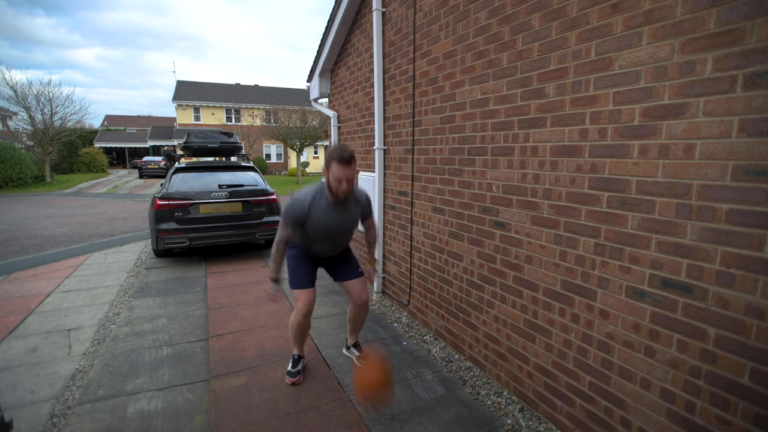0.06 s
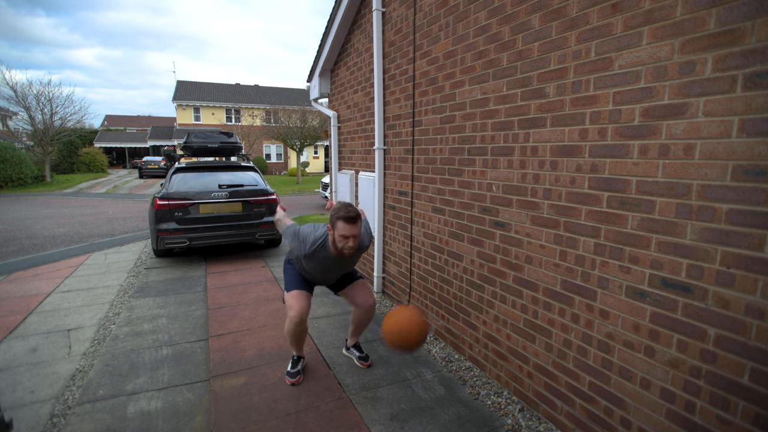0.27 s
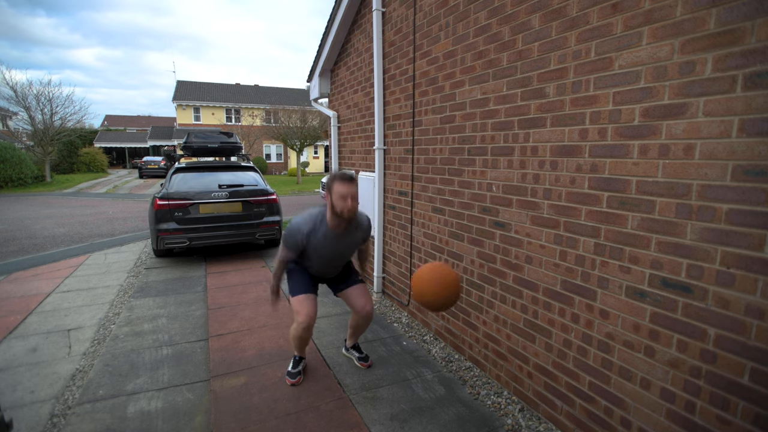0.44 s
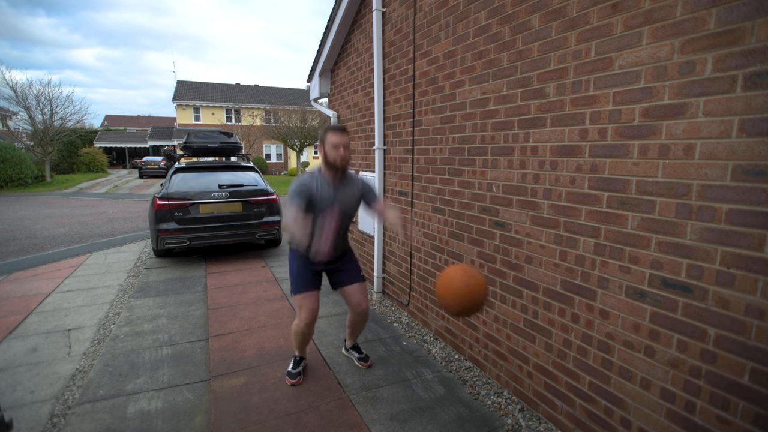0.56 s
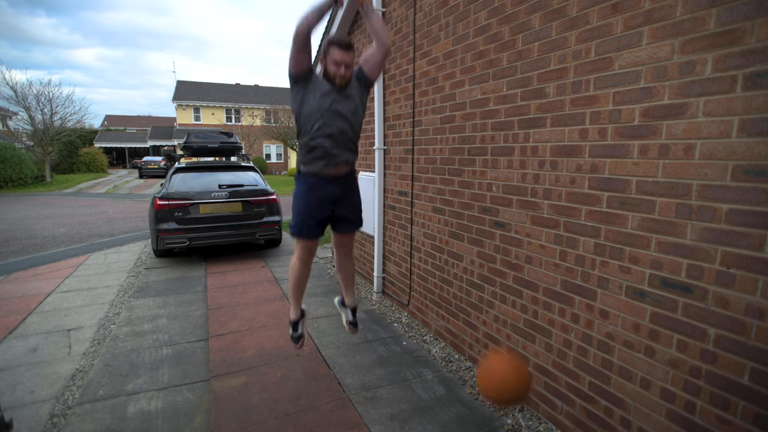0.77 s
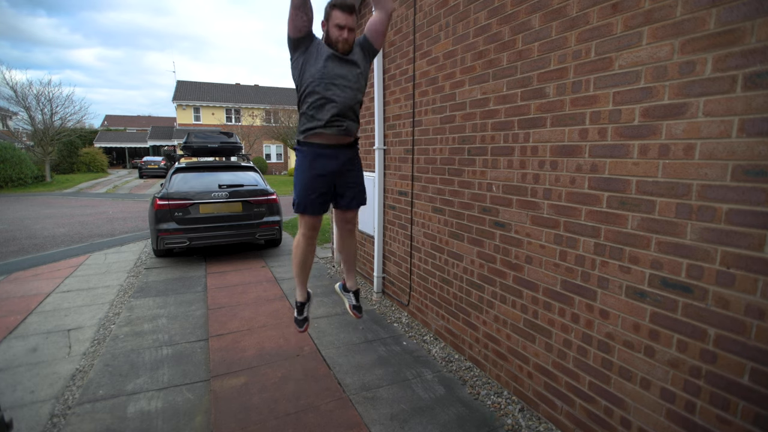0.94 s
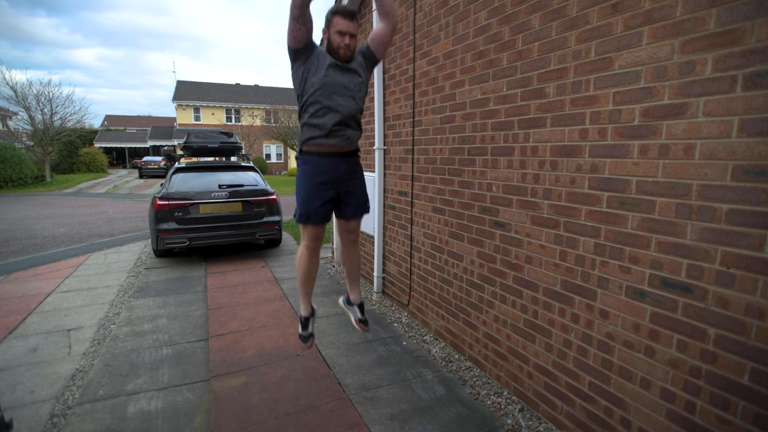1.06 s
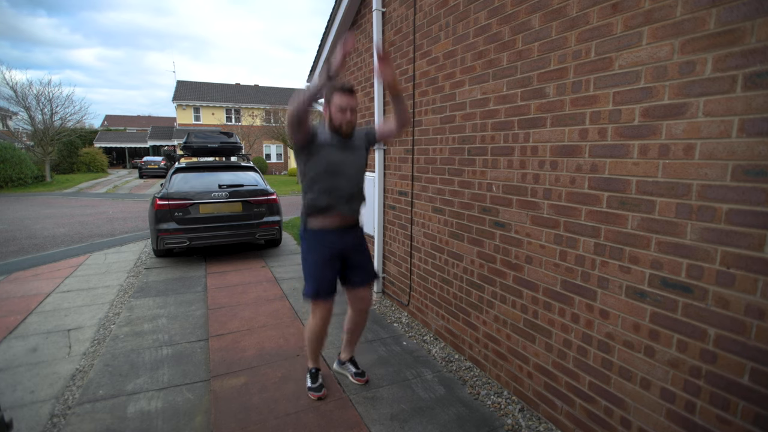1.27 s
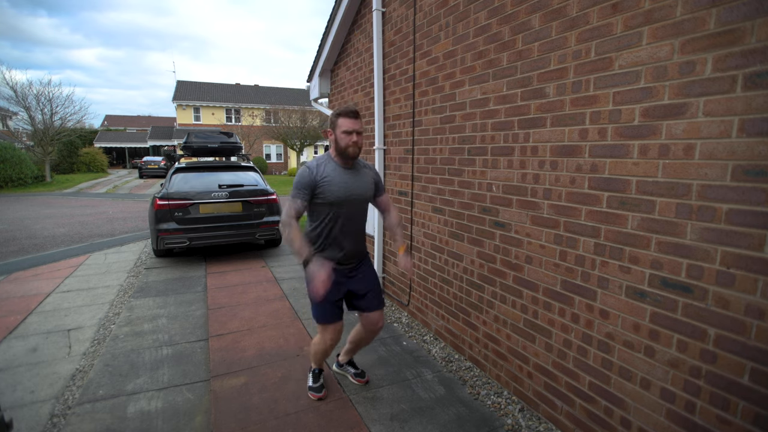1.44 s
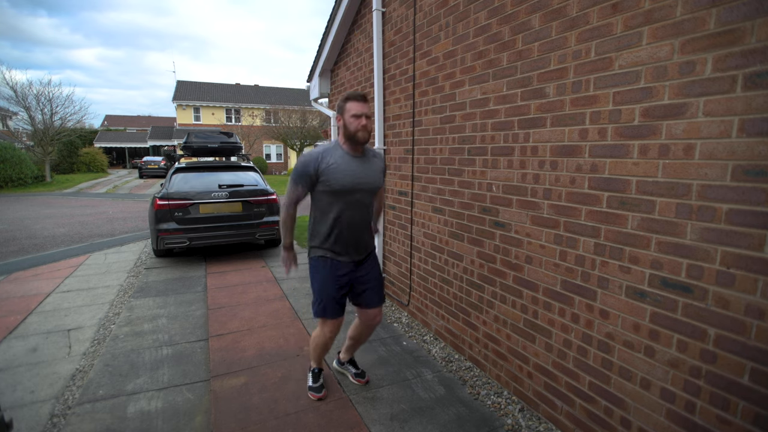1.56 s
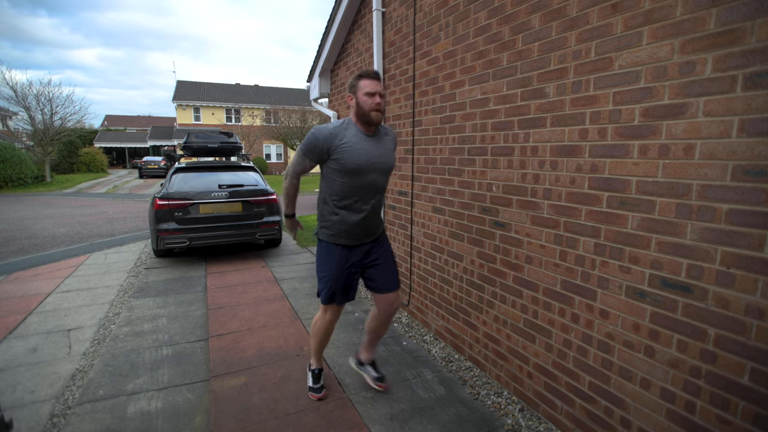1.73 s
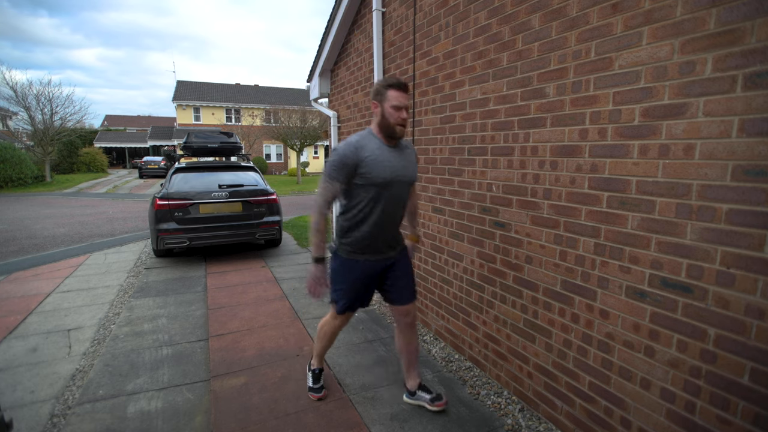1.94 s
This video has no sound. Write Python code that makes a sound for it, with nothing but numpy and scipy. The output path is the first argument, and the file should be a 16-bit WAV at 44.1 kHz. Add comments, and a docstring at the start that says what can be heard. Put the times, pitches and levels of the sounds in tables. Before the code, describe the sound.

Heavy ball slam on paving with sharp street echo, then a bounce, jumping feet and loose stones

```python
"""A paved drive beside a brick wall, houses beyond, over a quiet street hum that lasts throughout. Hands and cloth
swish at the throw, a knock sounds, then a heavy ball slams down and the house fronts throw the slam back. Shoes
scuff the grit as a jumper pushes off, the ball bounces, soles land; then hollow knocks and loose stones by the wall.
Blows are sharp pulses with near copies and noise tails; scuffs and stones are shaped noise grains; knocks are
damped tones; thuds are low tones that sink in pitch; the hum is coloured noise."""
import sys
import numpy as np
from scipy import signal
from scipy.fft import rfft, irfft
from scipy.io import wavfile
from scipy.ndimage import uniform_filter1d

SR = 44100
rng = np.random.default_rng(int(sys.argv[2]) if len(sys.argv) > 2 else 0)


def unload_wav(signal):
    """Save mono or channel-first audio to the path in sys.argv[1] as 16-bit WAV at rate SR, clipped to [-1, 1]."""
    wavfile.write(
        sys.argv[1],
        SR,
        np.round(np.clip(np.atleast_2d(signal).T, -1, 1) * 32767).astype(np.int16),
    )


N = 88200  # samples: 2 s


def amp(db):
    """Decibels to amplitude."""
    return 10 ** (np.asarray(db) / 20)


def unit(x):
    """Scale to an RMS of 1."""
    return x / np.sqrt(np.mean(x ** 2) + 1e-20)


def along(points, hz):
    """Read a curve of (Hz, value) points along a log frequency axis."""
    point_hz, values = np.transpose(points)
    return np.interp(np.log(hz + 1), np.log(point_hz + 1), values)


def smooth_patches(shape, bins, frames):
    """Random time-frequency patches, averaged over neighbouring bins and frames, RMS 1."""
    field = uniform_filter1d(rng.standard_normal(shape), size=bins, axis=0)
    return unit(uniform_filter1d(field, size=frames, axis=1))


def high_pass(x, cut_hz, order):
    """Butterworth bass cut."""
    return signal.sosfilt(signal.butter(order, cut_hz, "high", fs=SR, output="sos"), x)


def pulse(colour, tilt_db, size=4096):
    """The shortest causal (minimum-phase) pulse with this colour and tilt in dB per octave, energy 1."""
    hz = np.fft.rfftfreq(size, 1 / SR)
    colour_db = along(colour, hz) + tilt_db * np.log2((hz + 100) / 1000)
    cepstrum = irfft(np.log(amp(colour_db)))
    # folding the cepstrum onto positive time packs the energy at the start
    cepstrum[1:size // 2] *= 2
    cepstrum[size // 2 + 1:] = 0
    p = irfft(np.exp(rfft(cepstrum)))
    return p / np.linalg.norm(p)


def add(out, start_s, x):
    """Mix x into out from start_s, cut at the end of out."""
    place = out[round(start_s * SR):][:len(x)]
    place += x[:len(place)]


def swell(loudest_s, rise_s, t60_s):
    """Exponential rise (time constant rise_s) to 1 at loudest_s, then a fall of 60 dB in t60_s."""
    t = np.arange(N) / SR - loudest_s
    rise = np.exp(np.minimum(t, 0) / rise_s)
    fall = amp(-60 * np.maximum(t, 0) / t60_s)
    return np.where(t < 0, rise, fall)


# quiet street air, colour: freq_hz, density_db (dB per Hz, relative)
HUM_COLOUR = [(25, -72), (60, -15.5), (150, -3), (500, -9.5), (1100, -16), (1600, -20), (2800, -27.5),
              (3600, -17), (4300, -33.5), (5500, -32), (13000, -37)]
# its loudness over time: time_s, level_db
HUM_LEVEL = [(0, -48), (.22, -43), (.7, -45.5), (.92, -45), (1.05, -46.5), (1.36, -48.5), (1.662, -47.5),
             (2, -47)]


def hum():
    """Far traffic and air: coloured noise in slowly shifting time-frequency patches."""
    z = signal.stft(rng.standard_normal(N + 4096), nperseg=512)[2]
    air = signal.istft(z * amp(0.74 * smooth_patches(z.shape, 5, 12)), nperseg=512)[1]
    coloured = signal.fftconvolve(air, pulse(HUM_COLOUR, 0))[4096:N + 4096]
    level_db = np.interp(np.arange(N) / SR, *np.transpose(HUM_LEVEL))
    return amp(level_db) * unit(coloured)


# how long the street rings at speed 1: freq_hz, t60_s
STREET_DECAY = [(60, 0.64), (160, 0.42), (420, 0.33), (1100, 0.58), (2900, 0.68), (5000, 0.55),
                (8000, 0.31), (12000, 0.1)]
# where the speed factors apply, middle spanning two points: freq_hz
SPEED_HZ = (300, 1000, 3200, 5500)
LUMPS_DB = 1.5  # unevenness of the tail


def street(hold_s, bass, middle, treble):
    """A dense noise echo: full for hold_s, then each frequency dies at its own speed factor over its t60."""
    hz, t, z = signal.stft(rng.standard_normal(SR), SR, nperseg=256)
    lumps = smooth_patches(z.shape, 14, 3)
    speed = np.interp(hz, SPEED_HZ, [bass, middle, middle, treble]) / along(STREET_DECAY, hz)
    fall_db = 60 * speed[:, None] * np.maximum(t - hold_s, 0)
    tail = signal.istft(z * amp(LUMPS_DB * lumps - fall_db), SR, nperseg=256)[1]
    onset = 1 - np.exp(-np.arange(len(tail)) / SR / .004)
    return tail * onset / np.sqrt(SR * .01)


# the slam off house fronts, about 27 to 55 m away by delay: start_s, level_db, tilt_db_per_octave, bass_cut_hz
FRONTS = [(.404, 7, 2, 800), (.44, 5, -2, 200), (.487, -3, 1, 1500), (.555, -6, -1, 800),
          (.569, 0, -1, 950)]
FRONT_SPEED = 12  # decay speed factor, all bands


def fronts():
    """Each far wall returns the slam as a short noise burst in the ball's colour, thinned in the bass."""
    out = np.zeros(N)
    for start_s, level_db, tilt_db, cut_hz in FRONTS:
        tail = street(0, FRONT_SPEED, FRONT_SPEED, FRONT_SPEED)
        burst = signal.fftconvolve(tail, pulse(BALL_COLOUR, tilt_db))
        add(out, start_s, amp(level_db) * high_pass(burst, cut_hz, 4))
    return out


# short hollow knocks: loudest_s, pitch_hz, level_db, rise_s, t60_s
KNOCKS = [(.148, 375, -37, .006, .15), (.81, 3050, -26, .001, .05), (1.7065, 4900, -19, .0004, .07),
          (1.7095, 862, -19, .002, .07), (1.71, 440, -16, .002, .055), (1.711, 1080, -23, .002, .05),
          (1.991, 520, -30.5, .004, .5)]


def knocks():
    """Brief damped tones whose phase wanders a little."""
    t = np.arange(N) / SR
    out = np.zeros(N)
    for loudest_s, pitch_hz, level_db, rise_s, t60_s in KNOCKS:
        drift = 0.013 * np.cumsum(rng.standard_normal(N))
        tone = np.sin(2 * np.pi * pitch_hz * t + drift)
        out += amp(level_db) * swell(loudest_s, rise_s, t60_s) * tone
    return out


GRAINS_PER_S, GRAIN_SPREAD_DB = 4500, 1.6  # grain density; mean random boost of a grain
HISS_SHARE = 1  # hiss against grains, before the mix is levelled


def rubbing(rows, colour):
    """Friction as random fine grains plus smooth hiss, swelling and dying, with a little street tail."""
    out = np.zeros(N)
    for loudest_s, level_db, rise_s, t60_s, tilt_db, echo_db in rows:
        struck = rng.random(N) < GRAINS_PER_S / SR
        boost = amp(GRAIN_SPREAD_DB * rng.exponential(size=N))
        grains = unit(struck * rng.standard_normal(N) * boost)
        texture = unit(grains + HISS_SHARE * rng.standard_normal(N))
        rub = amp(level_db) * swell(loudest_s, rise_s, t60_s) * texture
        echo = signal.fftconvolve(rub, street(0, 0.91, 2.4, 1.5))[:N] / np.sqrt(SR * 0.0011)
        out += signal.fftconvolve(rub + amp(echo_db) * echo, pulse(colour, tilt_db))[:N]
    return out


# hands and cloth at the throw: loudest_s, level_db, rise_s, t60_s, tilt_db_per_octave, echo_db
SWISHES = [(.105, -42, 0.013, 0.31, 0, -18), (.128, -36.5, 0.011, 0.11, 5, -15)]
# their colour: freq_hz, density_db (dB per Hz, relative)
SWISH_COLOUR = [(590, -51), (1000, -17), (1350, 1.5), (3620, 4.5), (5750, -14), (10200, -13), (13000, -19)]


def swishes():
    """Hands and cloth rub as the ball is thrown: soft bursts of grains and hiss."""
    return rubbing(SWISHES, SWISH_COLOUR)


# loose stones by the wall: loudest_s, level_db, rise_s, t60_s, tilt_db_per_octave, echo_db
GRAVEL = [(1.7065, -19, .0004, 0.088, 0.68, 3.5), (1.711, -15, .001, 0.02, -1.1, -18),
          (1.722, -25, 0.009, 0.28, 0.78, -7), (1.812, -28.5, .004, 0.07, -1.2, -14),
          (1.826, -33.5, 0.0059, 0.14, 0.34, -32), (1.874, -29.5, 0.0073, 0.066, -0.11, -20),
          (1.886, -34, .004, 0.19, -0.19, -8), (1.926, -34.5, 0.0044, 0.086, -0.57, 1),
          (1.938, -38.5, 0.0067, 0.37, -2.3, -15)]
# their colour: freq_hz, density_db (dB per Hz, relative)
STONE_COLOUR = [(120, -62), (200, -21), (420, -1), (700, -7.5), (1100, -4), (2000, -4.5), (3700, -0.5),
                (5200, -4.5), (7200, -11), (8500, -20), (11800, -22.5), (13000, -35)]


def gravel():
    """Loose stones crunch by the wall: overlapping bursts of grains and hiss."""
    return rubbing(GRAVEL, STONE_COLOUR)


# shoes on grit, push-off then landing: loudest_s, level_db, rise_s, t60_s, tilt_db_per_octave, echo_db
SCUFFS = [(.797, -39.5, 0.015, 0.071, -3.5, -12), (.8068, -23, 0.0009, 0.042, -0.5, -12),
          (.8097, -22, .0004, 0.04, -1, 6), (0.825, -17.5, 0.0067, .1, -0.5, 0),
          (1.393, -23, 0.00051, 0.18, -3.5, 5.5), (1.411, -27, 0.0065, 0.18, -3, -7)]
# the grit's colour: freq_hz, density_db (dB per Hz, relative)
GRIT_COLOUR = [(180, -27), (300, -17), (640, -23), (785, -5.5), (1110, -16), (1430, -4), (3680, -11),
               (5380, -25.5), (8490, -23.5), (13000, -36)]


def scuffs():
    """Shoes grind grit on the paving: bursts of grains and hiss."""
    return rubbing(SCUFFS, GRIT_COLOUR)


# weight arriving: start_s, peak_db, start_pitch_hz, end_pitch_hz, time_to_peak_s
THUDS = [(.25, -15.5, 140, 55.25, 0.019), (1.075, -18.5, 134, 60, 0.0087), (1.395, -15, 175, 88, 0.016),
         (1.495, -15, 170, 112, 0.0057), (1.706, -36, 149, 120, 0.021), (1.811, -44, 132, 96, 0.017)]


def thuds():
    """Soft low pushes: tones that swell and fade while their pitch sinks."""
    out, t = np.zeros(N), np.arange(SR // 2) / SR
    for start_s, peak_db, high_hz, low_hz, peak_s in THUDS:
        pitch_hz = low_hz + (high_hz - low_hz) * np.exp(-t / peak_s)
        phase = 2 * np.pi * np.cumsum(pitch_hz) / SR
        push = (t / peak_s * np.exp(1 - t / peak_s)) ** 2
        add(out, start_s, amp(peak_db) * push * np.sin(phase))
    return out


SLAP_CUT_HZ = 464  # bass cut of the slap and its near copies


def blows(rows, colour, near, modes):
    """A thin sharp slap with copies off near surfaces, ringing, a short clatter and the street's tail."""
    out, t = np.zeros(N), np.arange(SR // 2) / SR
    for start_s, slap_db, tilt_db, clatter_db, fast, echo_db, hold_s, *speeds in rows:
        slaps = np.zeros(SR // 10)
        slaps[0] = amp(slap_db)
        for delay_s, copy_db in near:
            slaps[round(delay_s * SR)] += amp(slap_db + copy_db)
        echo = amp(echo_db) * street(hold_s, *speeds)
        clatter = amp(clatter_db) * street(0, fast, fast, fast)
        blow = echo + clatter
        add(blow, 0, -high_pass(slaps, SLAP_CUT_HZ, 2))
        add(out, start_s, signal.fftconvolve(blow, pulse(colour, tilt_db)))
        for pitch_hz, mode_db, t60_s in modes:
            wander = .045 * np.cumsum(rng.standard_normal(len(t)))
            onset = 1 - np.exp(-t / 0.0035)
            level = amp(echo_db + mode_db - 60 * t / t60_s)
            add(out, start_s, level * onset * np.sin(2 * np.pi * pitch_hz * t + wander))
    return out


# soles landing: start_s, slap_db, tilt_db_per_octave, clatter_db, clatter_speed, echo_db, echo_hold_s,
# bass_speed, middle_speed, treble_speed (speeds are decay factors)
SOLES = [(1.3903, 11.5, 0.5, 20.8, 8.3, 6.5, 0.023, 0.93, 1.45, 1.2),
         (1.432, 6, -1.3, 16.8, 8.1, 0.5, 0.0082, 1.6, 1.5, 1.7),
         (1.4952, 13, -2.97, 3.2, 4.6, 5.5, 0.025, 1.5, 1.48, 2.1)]
# their colour: freq_hz, density_db (dB per Hz, relative)
SOLE_COLOUR = [(29, -35), (50, -6), (227, 8.5), (895, 3.5), (1530, 3.5), (2120, -3.5), (3530, -8),
               (4780, -18), (7100, -35.5), (13000, -45)]
# close reflections: delay_s, level_db (against the slap)
SOLE_NEAR = [(.0015, -2), (.0037, -29), (.0062, -12)]


def soles():
    """Shoe soles slap the paving: pulses, near copies, clatter and tail, with no ringing."""
    return blows(SOLES, SOLE_COLOUR, SOLE_NEAR, [])


# ball on the ground, slam then bounce: start_s, slap_db, tilt_db_per_octave, clatter_db, clatter_speed, echo_db,
# echo_hold_s, bass_speed, middle_speed, treble_speed (speeds are decay factors)
BALL = [(.2452, 10.5, 0.5, 14, 3.3, 15, 0.039, 0.59, 0.81, 0.75),
        (1.0706, 8.5, -2, 9, 1.67, 6, 0.049, 1.32, 1.06, 4.7)]
# its colour: freq_hz, density_db (dB per Hz, relative)
BALL_COLOUR = [(29, -24), (50, -4), (250, -0.5), (500, -1.5), (860, 2), (1400, -1.5), (2100, -9),
               (2900, -11), (3700, -7.5), (4500, -16), (5400, -21), (13000, -35.5)]
# reflections off the wall and a car: delay_s, level_db (against the slap)
BALL_NEAR = [(.0021, 3.5), (.0052, -33), (.0075, -4), (.0125, 10), (.0155, -30), (.019, -4), (.027, 0)]
# the air and shell inside: pitch_hz, level_db (added to echo_db), t60_s
BALL_MODES = [(388.6, -23.5, 0.18), (604, -28.5, 0.38), (759.5, -29, 0.29), (874.5, -34.5, 0.57),
              (1263, -27, 0.17), (1498, -29, 0.14)]


def ball():
    """A heavy ball strikes the paving: sharp slap, wall copies, and the ringing of its air and shell."""
    return blows(BALL, BALL_COLOUR, BALL_NEAR, BALL_MODES)


def scene():
    """All layers summed, from the street to the ball, as one channel."""
    background = hum() + fronts() + knocks()
    rubs = swishes() + gravel() + scuffs()
    hits = thuds() + soles() + ball()
    return (background + rubs + hits)[None]


LOW_HZ, TOP_HZ = 43, 13750  # bass cut; stop-band edge of the treble cut
HISS_DB = -63
CLIP_TOP, CLIP_HARD = .9, 4  # ceiling (full scale 1); sharpness of the bend


def record(dry):
    """The microphone chain: a bass cut, faint hiss, squeezed loud peaks, then a steep treble cut."""
    x = high_pass(dry, LOW_HZ, 3) + amp(HISS_DB) * rng.standard_normal(dry.shape)
    x = x / (1 + np.abs(x / CLIP_TOP) ** CLIP_HARD) ** (1 / CLIP_HARD)
    return signal.sosfilt(signal.cheby2(12, 45, TOP_HZ, fs=SR, output="sos"), x)


dry = scene()
out = record(dry)
unload_wav(out)
```